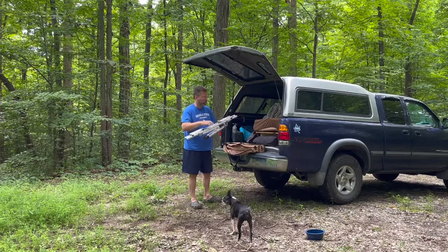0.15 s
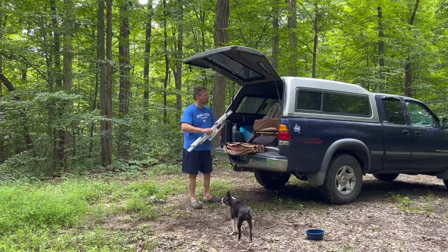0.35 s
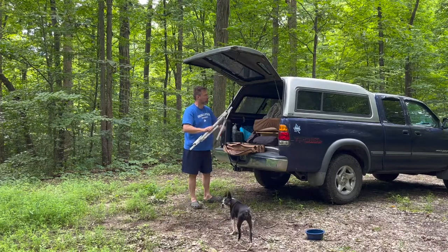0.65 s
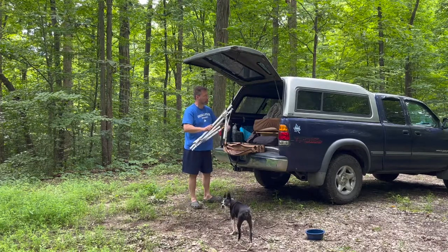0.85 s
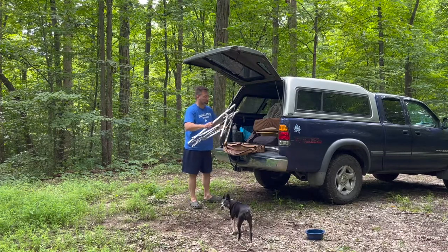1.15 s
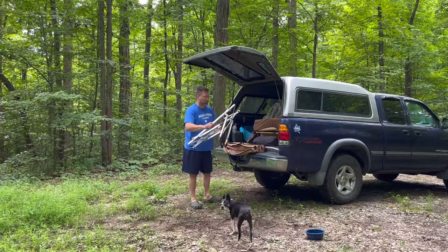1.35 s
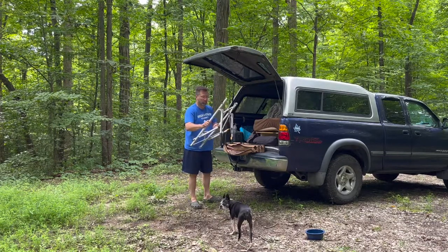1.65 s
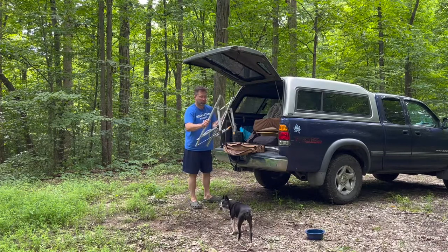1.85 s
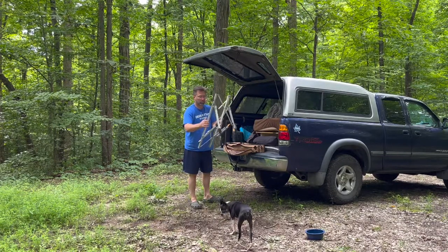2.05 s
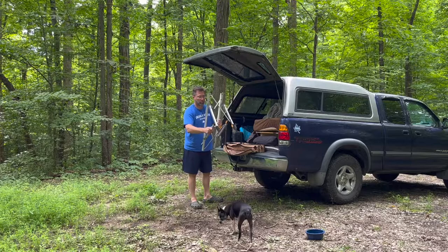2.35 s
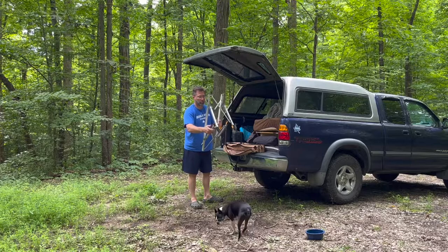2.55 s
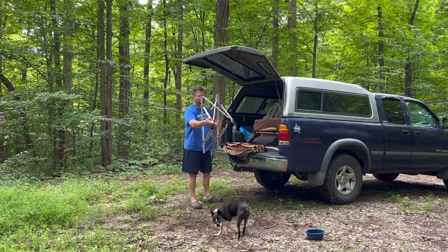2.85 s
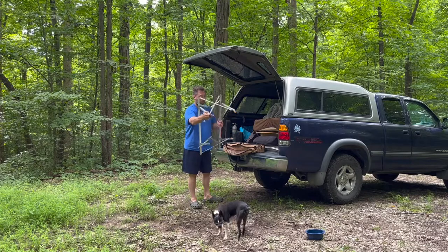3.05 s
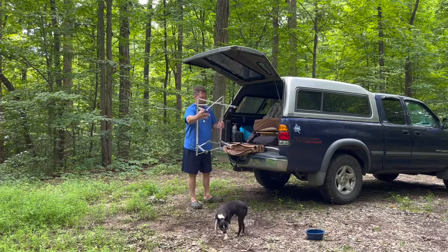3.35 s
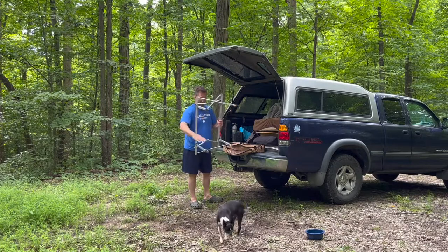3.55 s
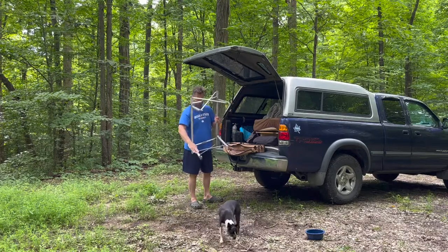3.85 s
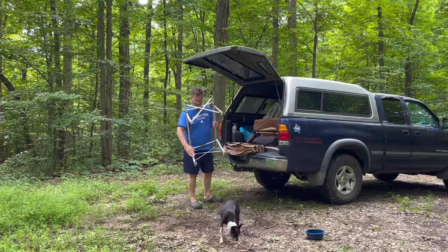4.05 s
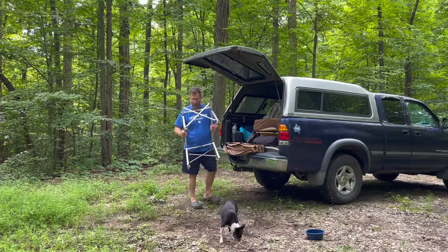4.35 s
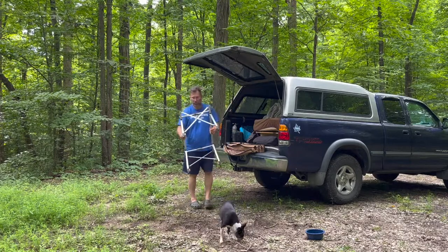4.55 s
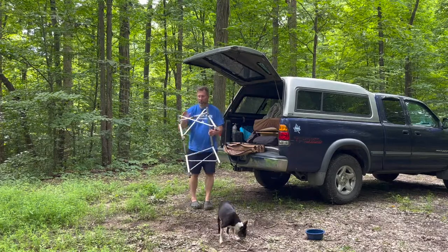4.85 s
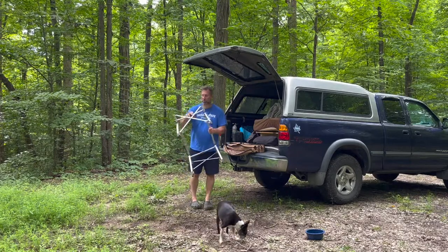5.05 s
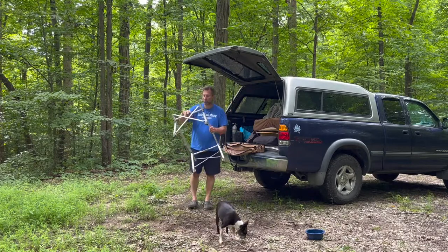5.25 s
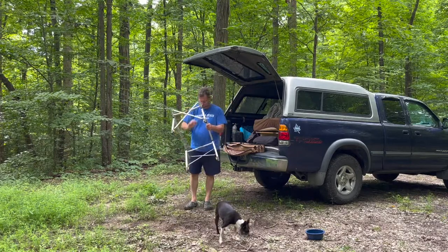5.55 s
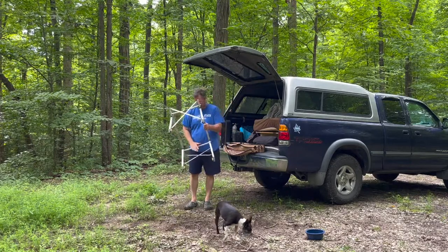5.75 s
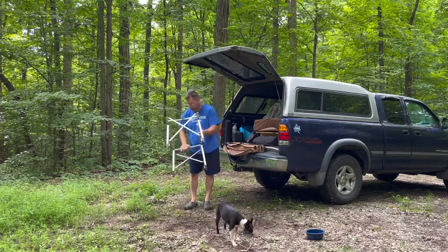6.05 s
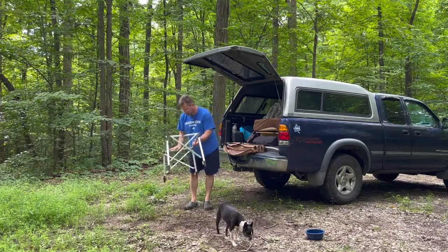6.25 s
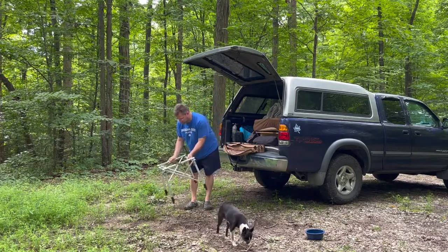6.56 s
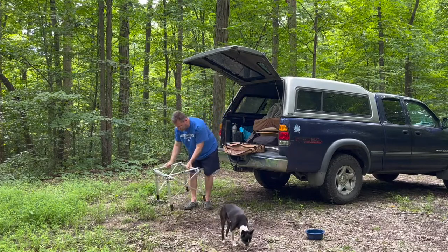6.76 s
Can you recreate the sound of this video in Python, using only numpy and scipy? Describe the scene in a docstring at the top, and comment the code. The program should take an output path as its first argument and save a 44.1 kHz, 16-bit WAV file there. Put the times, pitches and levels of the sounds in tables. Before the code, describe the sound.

A quiet forest clearing: low distant rumble with a wavering engine-like hum, faint leaf noise and a steady, thin high insect hiss, slightly stronger left. A few metres away, light aluminium tubes of a folding table frame are handled. A soft slide and small squeak at 0.2 s lead to a tight burst of clacks at 0.5-0.8 s. Sparse scrapes follow, with clinks near 1.6 s and 2.3 s. From 2.7 to 3.0 s the knocks quicken and ring more freely; a bright, sharp clack lands at 3.2 s. Gritty sliding and knocks come around 3.7-3.9 s, lighter ticks and a scrape near 4.5 s, then a long faint rub with clinks around 4.8-5.4 s. A firm hollow clack at 5.7 s buzzes briefly. Afterwards only faint slides and small taps at 6.5 and 6.8 s remain. Early reflections and a thin woodland tail surround the metal.

```python
"""A low distant rumble with an engine-like hum and a steady hiss of insects open the scene in a forest clearing.
A few metres from the microphone pair, a folding aluminium camp table frame is pulled open.
Its tubes slide in their joints as broken friction noise, and some joints squeak in a narrow resonance.
Tubes clack together as bursts of tiny contacts through resonances, then buzz and ring briefly.
The ground and a parked truck send early echoes, and the trees return a faint tail of scattered taps."""
import sys
import numpy as np
from scipy import signal
from scipy.fft import rfft, irfft
from scipy.io import wavfile
from scipy.ndimage import uniform_filter1d

SR = 44100
rng = np.random.default_rng(int(sys.argv[2]) if len(sys.argv) > 2 else 0)


def to_wav(sig):
    """Store sig (one row per channel, or 1-D mono) as 16-bit WAV at the path in sys.argv[1].

    Samples outside -1..1 are clipped; the rate is SR.
    """
    pcm = np.clip(np.atleast_2d(sig), -1, 1) * 32767
    pcm = np.round(pcm).astype(np.int16)
    wavfile.write(sys.argv[1], SR, pcm.T)  # frames by channels


N = 304731

# Tubes sliding in their joints. Each row: start in seconds, length in seconds, scrape level in dB,
# pitch of the rub in Hz.
STROKES = [(0.23, 0.15, -69, 4550), (0.514, 0.12, -52, 3940), (0.64, 0.22, -61.5, 4270),
           (0.813, 0.18, -70.5, 4460), (1.262, 0.11, -85.5, 5300), (1.53, 0.15, -56, 4400),
           (1.721, .16, -68.5, 4730), (1.972, .11, -69, 4750), (2.168, 0.24, -63.5, 4370),
           (2.426, 0.13, -75.5, 5230), (3.3, 0.14, -61, 4000), (3.652, 0.081, -53.5, 4080),
           (3.748, 0.13, -48.5, 4380), (3.908, 0.039, -56.5, 4000), (3.943, 0.04, -58, 4050),
           (3.965, 0.097, -67, 4180), (4.037, 0.068, -62, 1310), (4.126, 0.21, -66, 4540),
           (4.465, 0.16, -52.5, 1800), (4.624, 0.14, -70.5, 4730), (4.762, 0.74, -63.5, 2390),
           (5.497, 0.19, -61.5, 4120), (6.001, 0.057, -65.5, 3930), (6.137, 0.29, -75, 4750)]


def gain_of(db):
    """Decibels to gain."""
    return 10 ** (np.asarray(db) / 20)


def evened(x):
    """Scales to rms 1."""
    return x / np.sqrt(np.mean(x ** 2) + 1e-20)


def read(points, hz):
    """Reads a table on a log-frequency axis."""
    f, value = np.transpose(points)
    return np.interp(np.log(hz + 1), np.log(f + 1), value)


def add(mix, s, sound):
    """Adds a sound into the mix at time s."""
    part = mix[max(round(s * SR), 0):][:len(sound)]
    part += sound[:len(part)]


def coloured(x, points):
    """Filters x by the gains of a table and scales it to rms 1."""
    gain = gain_of(read(points, np.fft.rfftfreq(N, 1 / SR)))
    return evened(irfft(rfft(x) * gain, N))


def drift(per_s):
    """A random wander of rms 1, with little left above per_s in Hz."""
    f = np.fft.rfftfreq(N, 1 / SR)
    return evened(irfft(rfft(rng.standard_normal(N)) * np.exp(-(f / per_s) ** 2), N))


def spread(mid, side):
    """Left and right from a shared part and an opposed part."""
    return np.array([mid + side, mid - side])


def pair(apart):
    """Two channels of noise: a shared part and an opposed part."""
    mid, side = rng.standard_normal((2, N))
    return spread(mid, apart * side)


def background(rumble_db=-45, leaves_db=-70, insects_db=-64, waver=1.0):
    """Far rumble and leaves as filtered noise, a hum of wavering sines, and a fluttering chorus of insects."""
    # Each row: frequency in Hz, relative level in dB; one table for each bed of noise.
    rumble_colour = [(20, -42), (32, -12), (45, 0), (70, 4.5), (130, 0.5), (165, -4.5), (200, -12),
                     (255, -6), (310, -17), (400, -22), (550, -37), (1000, -51)]
    leaves_colour = [(600, 3.5), (1200, -2), (2200, -6.5), (4500, -7.5), (9000, -45), (13000, -29),
                     (15500, -41)]
    insects_colour = [(4000, -29), (5100, -13), (5500, 2), (6000, 7), (6400, 3), (6900, 8), (7500, 1),
                      (8100, -39), (8700, -35), (11000, -38)]
    # The distant hum. Each row: frequency in Hz, mean level in dB at the start, mean level in dB at the end.
    hum_tones = [(107.8, -53.5, -44.5), (273.4, -61, -74)]
    t = np.arange(N) / SR
    hum = np.zeros(N)
    for f, first_db, last_db in hum_tones:
        level_db = first_db + (last_db - first_db) * t / t[-1] + 2 * drift(0.85)
        phase = 2 * np.pi * f * t + waver * drift(1.9)
        hum += gain_of(level_db) * np.sqrt(2) * np.sin(phase)
    rumble = gain_of(rumble_db + drift(10)) * coloured(pair(0.15), rumble_colour)
    leaves = gain_of(leaves_db) * coloured(pair(1.0), leaves_colour)
    insects = gain_of(insects_db + 0.91 * drift(23)) * coloured(pair(0.76), insects_colour)
    insects *= gain_of([[.6], [-.6]])  # a little stronger on the left
    return hum + rumble + leaves + insects


def patchy(x):
    """As the contact point travels, single resonances of the tube come and go."""
    patch_db = 3.3
    z = signal.stft(x, nperseg=512)[2]
    field = uniform_filter1d(rng.standard_normal(z.shape), size=8, axis=0)  # over frequency
    field = uniform_filter1d(field, size=7, axis=1)  # over time
    return signal.istft(z * gain_of(patch_db * evened(field)), nperseg=512)[1][:N]


def rub_wander():
    """As the contact travels its resonance wanders: a factor on its frequency."""
    depth_octaves, per_s = .04, 18
    return 2 ** (depth_octaves * drift(per_s))


def resonate(x, hz, width_hz):
    """Two equal resonances in a row that follow the curve hz."""
    turn, r = np.exp(2j * np.pi * np.cumsum(hz) / SR), np.exp(-np.pi * width_hz / SR)
    for _ in range(2):
        x = 2 * (turn * signal.lfilter([1 - r], [1, -r], x / turn)).real
    return x


def sliding(catch_db=4, rub_db=8):
    """Each stroke is friction broken into small catches; part of it sings in a broad resonance of the tube."""
    # Colours of the rough scrape and the fine fizz. Each row: frequency in Hz, relative level in dB.
    scrape_colour = [(300, -4), (800, -3.5), (1800, 1.5), (4500, -5), (6500, -13), (9000, -2), (13000, -43)]
    fizz_colour = [(4000, -14), (8000, 2), (9500, 3), (12000, 2.5), (13600, -6), (14600, -3), (16000, -35)]
    pressure_db, rub_width_hz = 2.3, 1300
    # fizz of a moderate stroke; it grows more slowly than the scrape, and with a higher rub
    moderate_fizz_db, moderate_db, moderate_hz = -58, -62.5, 5070
    fizz_growth, fizz_db_per_octave = .65, 15
    # a quick slip squeaks, a long stroke scrapes broadly: singing lost per doubling of the slip's length
    slip_s, sing_loss_db = .045, 4.5

    catches = evened(gain_of(catch_db * drift(160) + pressure_db * drift(25)))
    rough, fine, slips = (patchy(noise) for noise in rng.standard_normal((3, N)) * catches)
    wander = rub_wander()
    rough, fine = coloured(rough, scrape_colour), coloured(fine, fizz_colour)
    out = np.zeros(N)
    for s, length, db, hz in STROKES:
        part = slice(round(s * SR), round((s + max(length, .02)) * SR))
        rub = resonate(slips[part], hz * wander[part], rub_width_hz)
        sing_db = rub_db - sing_loss_db * np.log2(max(length, slip_s) / slip_s)
        scrape = evened(evened(rough[part]) + gain_of(sing_db) * evened(rub))
        fizz_db = moderate_fizz_db + fizz_growth * (db - moderate_db)
        fizz_db += fizz_db_per_octave * np.log2(hz / moderate_hz)
        stroke = gain_of(db) * scrape + gain_of(fizz_db) * evened(fine[part])
        add(out, s, stroke * signal.windows.tukey(len(stroke), .5))
    return out


def squeaks():
    """A dry joint sticks and slips: noise sings faintly in one narrow, wandering resonance."""
    # Joints squeaking as they turn. Each row: start in seconds, length in seconds, level in dB, pitch in Hz.
    dry_joints = [(0.243, .11, -60, 4730), (2.013, 0.082, -71, 3970), (4.99, .08, -69, 2500),
                  (5.42, 0.071, -68, 3780), (5.54, .1, -61, 5320)]
    wander, out = rub_wander(), np.zeros(N)
    for s, length, db, hz in dry_joints:
        pitch = hz * wander[round(s * SR):][:round(length * SR)]
        tone = resonate(rng.standard_normal(len(pitch)), pitch, width_hz=450)
        add(out, s, gain_of(db) * evened(tone) * signal.windows.tukey(len(tone), .5))
    return out


def ticks(count=2):
    """Light knocks at random moments of each stroke, as rows like those of the blows."""
    over_db, scatter_db = 1, 5  # relative to the scrape
    lift_db, body_db, treble_db = 12, -13.5, 15
    chance = rng.random((len(STROKES), count, 3))
    rows = []
    for (s, length, db, hz), draws in zip(STROKES, chance):
        for when, force, spot in draws:
            tick_db = db + over_db + scatter_db * (2 * force - 1)
            spot_hz = hz * 2 ** (spot - 1)  # up to an octave below the rub
            rows.append((s + when * length, tick_db, spot_hz, lift_db, body_db, treble_db))
    return rows


def hump(hz, centre_hz, width_hz):
    """The outline of one resonance, 1 at its centre."""
    return 1 / (1 + (2 * (hz - centre_hz) / width_hz) ** 2)


def lumps(count, size):
    """Random values of rms 1, smoothed over size neighbours."""
    return evened(uniform_filter1d(rng.standard_normal(count), size=size))


def causal(db):
    """The impulse response, with no lead-in, of a gain curve in dB."""
    log_gain = np.log(gain_of(np.concatenate([db, db[-2:0:-1]])))
    return np.fft.ifft(np.exp(np.conj(signal.hilbert(log_gain)))).real


def mode(t, hz, db, t60):
    """One tone that dies away from time zero."""
    return gain_of(db - 60 * np.maximum(t, 0) / t60) * np.sin(2 * np.pi * (hz * t + rng.random()))


def knock(low_db, high_db, spot_hz, lift_db, t60, ring_db, loose_db, folded, lead=.008, spiky_db=4.0,
          ring_share=0.15, uneven_db=3.0, buzz_db=-23, buzz_t60=0.41, rattle_db=3):
    """Loose metal grazes and chatters at one spot, then the frame buzzes out and rings from time lead on."""
    # Colour of a knock. Each row: frequency in Hz, relative level in dB.
    clack_colour = [(150, -12), (400, -8.5), (650, -3.5), (900, -8), (1250, -2), (2200, -1), (3400, -1),
                    (5000, -4.5), (7500, -3.5), (10500, -1), (12500, -7.5), (15600, -10.5), (16300, -60)]
    # Short hollow resonances of the frame. Each row: frequency in Hz, width in Hz, lift in dB.
    hollows = [(2870, 120, 3.5), (3450, 220, 3), (4460, 100, -1)]
    # Further resonances of the tubes lying bundled. Each row: frequency in Hz, width in Hz, full lift in dB.
    bundle = [(1380, 45, 10), (4600, 430, 9.7)]
    # Lingering buzz against the knock. Each row: frequency in Hz, relative level in dB.
    buzz_colour = [(1000, 1.5), (2800, -1.5), (5000, 4.5), (11000, 2.5)]
    # Ringing of the tubes. Each row: frequency in Hz, relative level in dB, 60 dB decay in seconds.
    tubes = [(1730, -30, .42), (2620, -37, .45), (2790, -32, .55), (3120, -36, .4), (3390, -33, .5),
             (4170, -30, .5), (4450, -32, .45), (4960, -31, .4), (5190, -32, .4)]
    # Thin ping of the joint pins. Each row: frequency in Hz, relative level in dB, 60 dB decay in seconds.
    pins = [(6525, -17.5, 0.1), (13480, -39, 0.13)]
    graze_t60, beat_s = .008, .015

    t, hz = np.arange(SR // 2) / SR - lead, np.fft.rfftfreq(2048, 1 / SR)
    tilt = [(1000, low_db), (1450, 0), (5000, 0), (10000, high_db)]
    frame_db = read(clack_colour, hz) + read(tilt, hz)
    frame_db += sum(db * hump(hz, f, w) for f, w, db in hollows)
    frame_db += folded * sum(db * hump(hz, f, w) for f, w, db in bundle)
    # each blow lands elsewhere; more lift is more selective (5 dB halves the width), but the hands damp it
    width_hz = max(spot_hz * 1.43 / 2 ** (lift_db / 5), 520)
    spot_db = lift_db * hump(hz, spot_hz, width_hz)
    body = causal(frame_db + spot_db + uneven_db * lumps(len(hz), size=14))

    # many tiny contacts of uneven strength, building up over a few ms of grazing
    contacts = rng.standard_normal(len(t)) * gain_of(spiky_db * lumps(len(t), size=60))
    before, after = np.maximum(-t, 0), np.maximum(t, 0)
    graze = gain_of(-60 * before / graze_t60)
    shape = graze * gain_of(-60 * after / max(t60, .008))
    clack = signal.fftconvolve(contacts * shape, body)[:len(t)]
    clack *= np.linalg.norm(shape) / np.linalg.norm(clack)

    # the loose joints rattle on and blur the dense upper modes into a bright buzz
    rattle = evened(rng.standard_normal(len(t)) * gain_of(rattle_db * lumps(len(t), size=90)))
    buzz = signal.fftconvolve(rattle, causal(frame_db + read(buzz_colour, hz)))[:len(t)]
    buzz *= gain_of(buzz_db + loose_db - 60 * after / buzz_t60)

    # the tubes are nearly alike, so each mode is a cluster that beats unevenly; the pins ping
    beats, ring = np.arange(-lead, t[-1], beat_s), np.zeros(len(t))
    for f, db, ring_t60 in tubes:
        beating = np.interp(t, beats, evened(rng.standard_normal(len(beats))))
        struck_db = db + ring_share * lift_db * hump(f, spot_hz, width_hz)
        ring += beating * mode(t, f, struck_db, ring_t60)
    ping = sum(mode(t, f, db + loose_db + read(tilt, f), ping_t60) for f, db, ping_t60 in pins)
    after_sound = buzz + ping + .5 * gain_of(ring_db) * ring
    return clack + after_sound * graze / np.linalg.norm(body)


def blow(s, db, spot_hz, lift_db, body_db, treble_db):
    """One knock: the spot sets its colour, its level its decay, and the grip of the hands damps its ring."""
    # How freely the frame hangs in the hands. Each row: time in seconds, relative ring of the tubes in dB,
    # relative buzz of the loose joints in dB.
    freedom = [(.6, -9, -4), (2.88, -12, -7), (2.97, -2, -1), (3.2, 2, 0), (3.7, -1, 1), (5.3, -2, 1),
               (5.69, -5.5, 3), (6.5, -12, -3)]
    # decay of a knock by its level: each drop of doubling_db doubles the decay
    base_t60, base_db, doubling_db = 0.04, -16.5, 35.5
    open_s = 2.6  # the bundle's resonances fade until then
    t60 = base_t60 * 2 ** ((base_db - db) / doubling_db)
    times, ring_db, loose_db = np.transpose(freedom)
    ring_now, loose_now = np.interp(s, times, ring_db), np.interp(s, times, loose_db)
    folded = max(1 - s / open_s, 0)
    return gain_of(db) * knock(body_db, treble_db, spot_hz, lift_db, t60, ring_now, loose_now, folded)


def knocks(level_db=-7, early=0.0078):
    """All blows of the frame, firm and light, each begun early (s) to allow for its graze."""
    # Tubes and joints knocking. Each row: time in seconds, relative level in dB, frequency in Hz that the
    # struck spot favours, lift of that resonance in dB, low body in dB, treble in dB.
    blows = [(0.503, -33.5, 4400, 2.5, 4, -5), (0.542, -19, 2560, 4, -8, -4),
             (.581, -15.5, 2430, 14, -3.5, -4.5), (0.589, -23, 2240, 18, -4, -6),
             (.602, -34, 1800, 2, 7, -8), (0.612, -21.5, 1980, 7, -7, -4), (0.616, -20.5, 3300, 9, 2.5, 0),
             (.643, -35.5, 4400, 9, 6.5, -2), (.691, -35, 1866, 13, 0, -16),
             (0.728, -30.5, 2000, 9, 4.5, -6), (0.751, -32, 4600, 15, -5, -12), (.768, -29, 1420, 3, 5, -6),
             (.841, -33.5, 4740, 8.5, -18, 12.5), (0.966, -38.5, 776, -1, 19.5, -4),
             (1.572, -28.5, 2680, -3, -13, -20), (1.592, -24, 4330, 5.5, 1.5, -1.5),
             (1.788, -42, 1850, 13, 7, -20), (1.813, -44, 2600, -5, 3, -5),
             (1.895, -43.5, 2230, 13, 2, -11), (2.162, -37.5, 2100, 5, -8, -14),
             (2.218, -40, 1600, 4, -25, -12), (2.309, -22.5, 2010, 0.5, -13, -9.5),
             (2.338, -27, 2110, 7, 0.5, -5), (2.354, -25.5, 4360, 11, -3, 9.5),
             (2.397, -30.5, 2100, 0.5, -7, -11), (2.717, -27, 3360, 11.5, 2, -0.5),
             (2.742, -28, 2520, 3, 2.5, -3), (2.756, -24, 3120, -14.5, -2.5, -4.5),
             (2.773, -26, 3370, 13, 3, -3), (2.829, -35.5, 3060, 9, -5, -12),
             (2.844, -28.5, 3360, 9, -1.5, -2), (2.861, -34.5, 3000, 2, 0, -7),
             (2.889, -22.5, 3100, 14, -5, -4.5), (2.966, -19.5, 2780, 15, -2, -3.5),
             (3.027, -39.5, 4100, 10, -12, 24), (3.167, -24.5, 1860, 12.5, 8.5, -14),
             (3.17, -14.5, 4500, 12, -22, -2.5), (3.337, -41, 900, 5, 5, -19),
             (3.369, -36, 2040, -3, 7, -8), (3.658, -40.5, 2650, -6, 12, 5.5),
             (3.699, -36.5, 1860, 2, 7.5, 5.5), (3.784, -22.5, 1950, 3.5, 3, 3.5),
             (3.822, -24, 1800, 2, 6, 4.5), (4.082, -43.5, 1010, 17, 12, -34),
             (4.208, -36, 1900, 9.5, 0, 0), (4.288, -46.5, 1010, 23, 31, -20),
             (4.406, -29.5, 2620, 2.5, 4.5, -20), (4.475, -25.5, 10600, 0, -10, 19),
             (4.9, -30.5, 1330, 11.5, 8.5, -29), (5.074, -32.5, 2010, 9, -6, -9),
             (5.093, -22, 1940, 10.5, -1, -6.5), (5.251, -31.5, 3400, -2, -3, 6.5),
             (5.27, -32.5, 1920, 9, 5.5, 0), (5.313, -38, 4450, 15, -12, 19),
             (5.4, -30.5, 1680, 10, 5, -24), (5.691, -14.5, 1580, 6, 3, -2),
             (5.701, -21, 684, 16.5, -7, -2), (5.735, -27.5, 2530, 10, 6.5, -14),
             (6.538, -36, 3240, 11, 8.5, -5), (6.819, -33, 2020, 2, 5, -13)]
    out = np.zeros(N)
    for row in blows + ticks():
        add(out, row[0] - early, gain_of(level_db) * blow(*row))
    return out


def near_echoes(x, echo_db=-15, t60=0.028):
    """The ground and the parked truck send early echoes of the upper middle range from the side."""
    t = np.arange(SR // 20) / SR
    taps = rng.standard_normal(len(t)) * (rng.random(len(t)) < .05) * gain_of(-60 * t / t60)
    band = signal.butter(3, [2400, 6800], "band", fs=SR)
    taps = signal.lfilter(*band, taps / np.linalg.norm(taps))
    side = gain_of(echo_db) * signal.fftconvolve(x, taps)[:N]
    return spread(0, side)


def forest(x, wet_db=-18, apart=0.96):
    """Trunks and leaves scatter a thin tail, partly different at each port."""
    # Decay of the tail. Each row: frequency in Hz, 60 dB decay in seconds.
    tail_t60 = [(600, 0.6), (2500, 0.48), (5000, 1), (10000, 0.1), (15000, 0.67)]
    taps = rng.standard_normal((2, SR)) * (rng.random((2, SR)) < 2500 / SR)  # 2500 taps a second
    taps *= np.minimum(np.arange(SR) / SR / 0.0067, 1)
    hz, t, z = signal.stft(taps, SR, nperseg=256)
    decay = gain_of(-60 * t / read(tail_t60, hz)[:, None])
    mid, side = signal.istft(z * decay, SR, nperseg=256)[1]
    side = signal.lfilter(*signal.butter(4, 6500, fs=SR), side)
    tail = spread(mid, apart * side)
    tail /= np.linalg.norm(tail[0])
    return gain_of(wet_db) * signal.fftconvolve(x[None], tail, axes=1)[:, :N]


def scene():
    """The frame in its clearing."""
    frame = knocks() + sliding() + squeaks()
    return frame + near_echoes(frame) + forest(frame) + background()


def record(dry):
    """Two microphone ports hear each frequency with their own phase and level; then the band limit."""
    # Each row: frequency in Hz, phase in radians by which the left port leads.
    port_phase = [(0, 0), (2100, 0), (2900, .5), (4600, .3), (5700, -.85), (6900, -1.2), (8000, -2.8),
                  (10000, -4.9), (12600, -6.7), (15200, -9.4)]
    # Each row: frequency in Hz, left minus right in dB.
    port_balance = [(100, -0.06), (300, -1.9), (1200, 0.093), (3000, 1.7), (6500, 2), (9000, -0.73)]
    hz = np.fft.rfftfreq(N, 1 / SR)
    half_lead, half_balance = read(port_phase, hz) / 2, read(port_balance, hz) / 2
    left = gain_of(half_balance) * np.exp(1j * half_lead)
    right = gain_of(-half_balance) * np.exp(-1j * half_lead)
    heard = irfft(rfft(dry) * np.array([left, right]), N)
    edge = signal.firwin(511, 16200, window=("kaiser", 9), fs=SR)  # low-pass at 16.2 kHz
    return signal.oaconvolve(heard, edge[None], "same")


dry = scene()
out = record(dry)
to_wav(out)
```